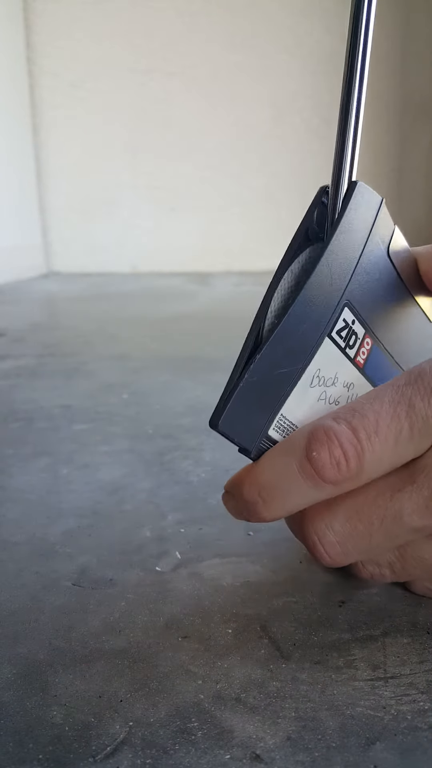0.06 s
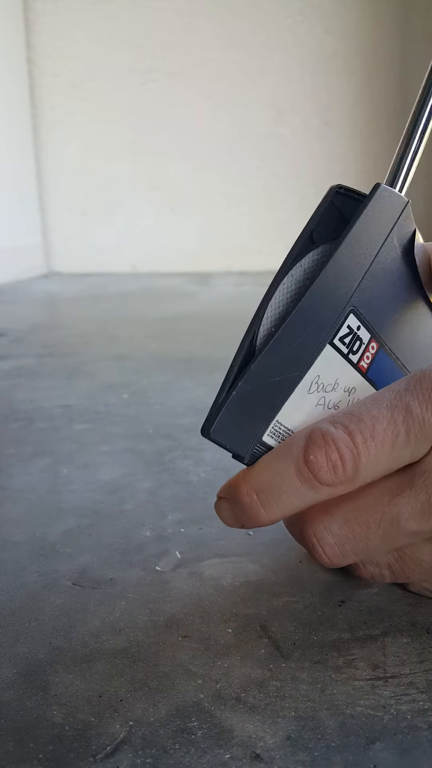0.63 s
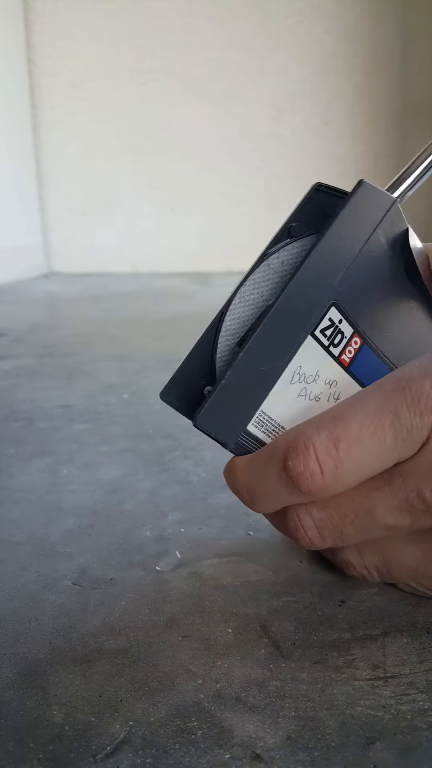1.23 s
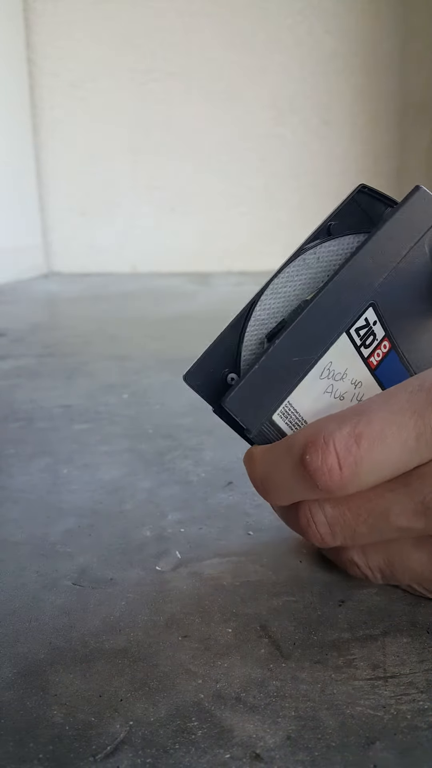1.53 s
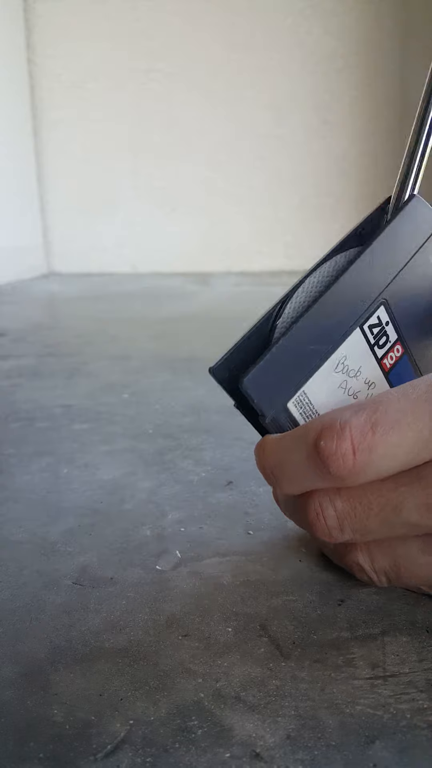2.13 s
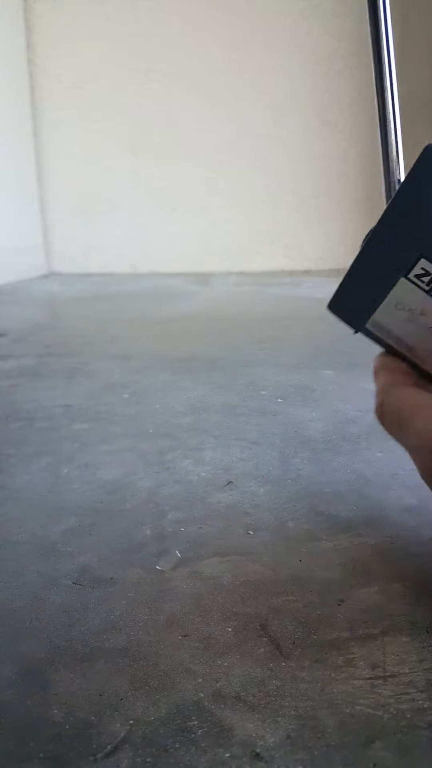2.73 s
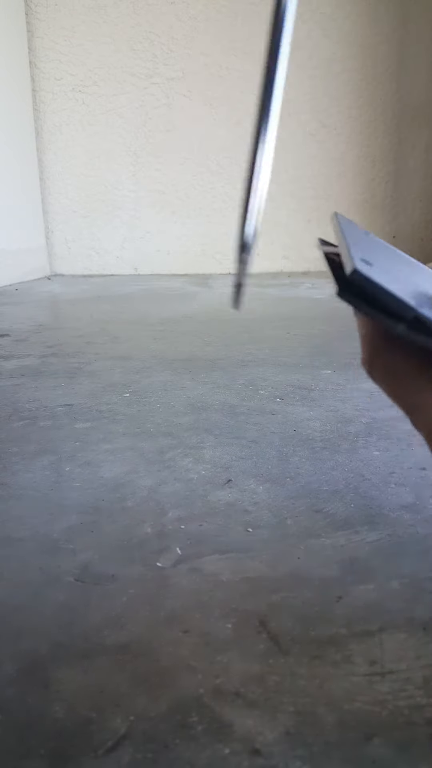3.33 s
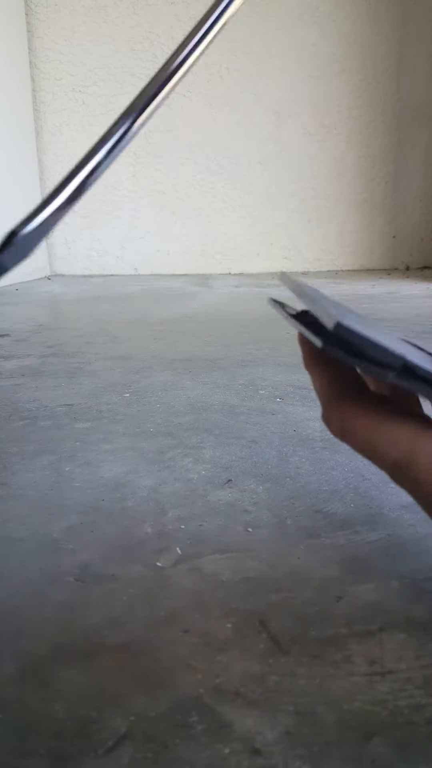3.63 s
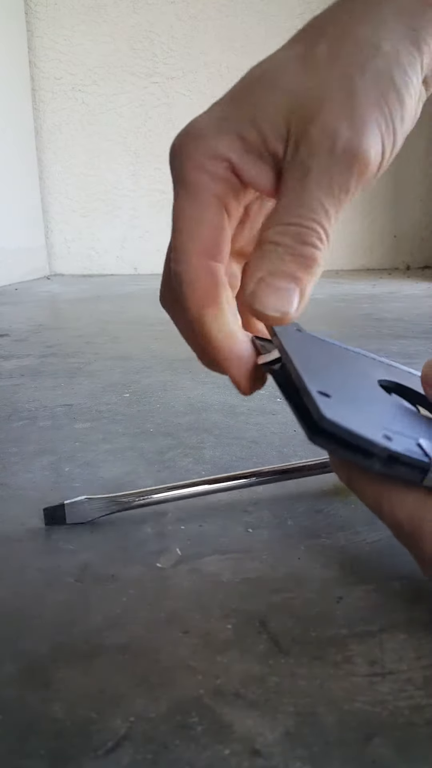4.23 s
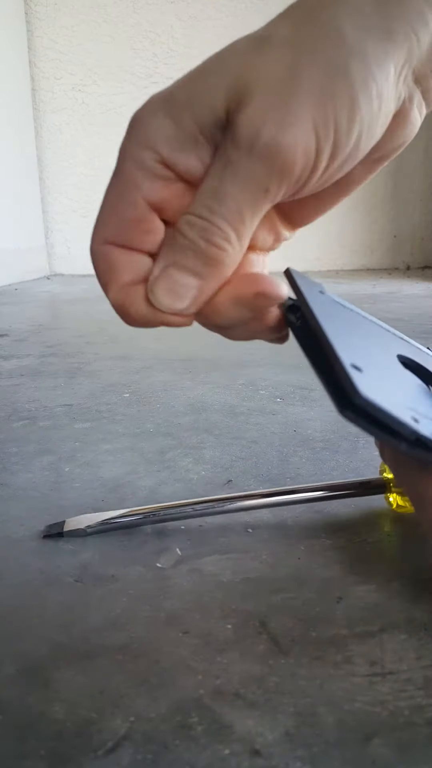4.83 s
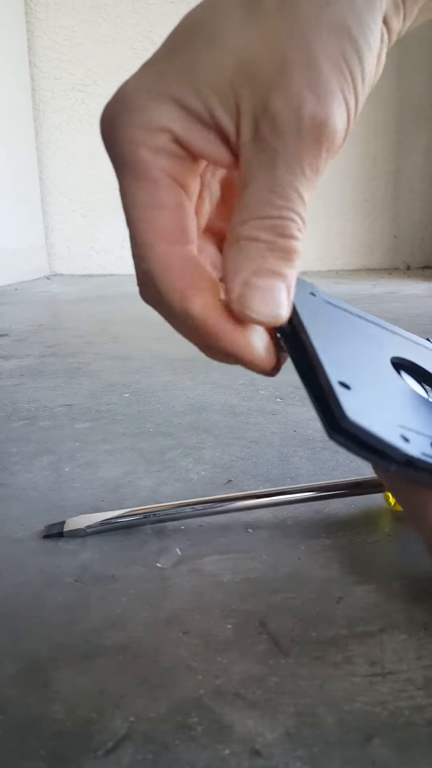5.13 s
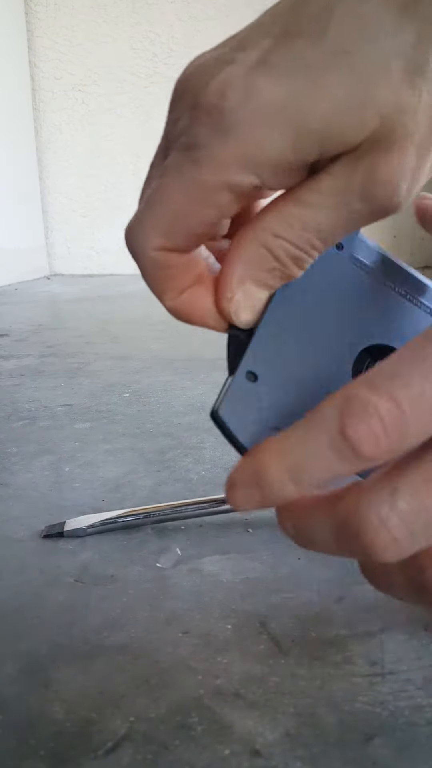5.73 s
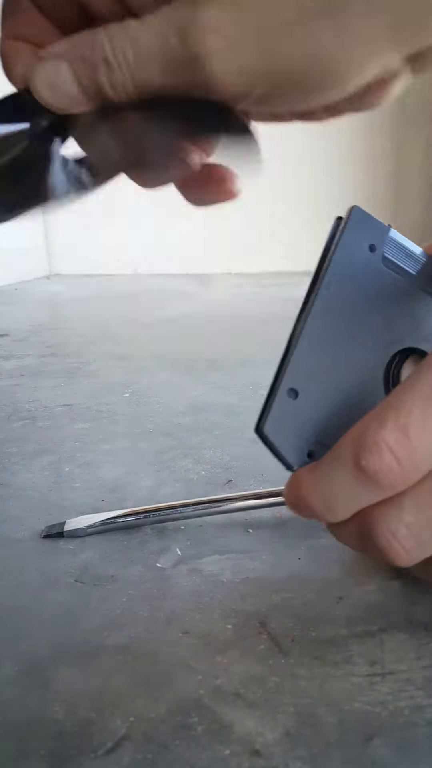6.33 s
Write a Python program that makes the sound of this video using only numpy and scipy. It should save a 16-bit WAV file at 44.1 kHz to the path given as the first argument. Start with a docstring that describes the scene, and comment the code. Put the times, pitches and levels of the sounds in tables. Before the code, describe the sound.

A low, steady hum fills a small bare room. Close by, a screwdriver scrapes and clicks in the seam of a hollow plastic disk cartridge. The plastic cracks at 0.5 and 0.7 seconds, then gives its loudest crack near 0.8, with a short rattle and a brief high ring from the shell and steel shaft. Lighter slips, scrapes and knocks follow, clustering around 2.2 seconds and again near 2.7. At about 3.2 the shell scrapes, knocks and chatters. Near 3.9 the screwdriver is laid on the hard floor and rocks to rest in a few quick taps. From 4 seconds, fingers and a thin flexible disk slide softly against the shell, with scattered ticks and a sharper one at 4.5. The film crackles more strongly from 5.5 to 6.1 as it comes out. The shell snaps and rattles at 6.3. Each click has a short room echo.

```python
"""Over the low hum of a small bare room, a screwdriver scrapes and slips in the seam of a plastic disk
cartridge, just above a hard floor. The hollow shell knocks, its welds crack and its halves chatter;
the loudest crack sets shell and steel shaft ringing. Near 4 s the tool is laid down and rocks to rest.
Then the thin disk slides and crackles out, and the shell snaps once more. The room answers each click."""
import sys
import numpy as np
from scipy import signal
from scipy.fft import rfft, irfft
from scipy.io import wavfile
from scipy.ndimage import uniform_filter1d

SR = 44100
rng = np.random.default_rng(int(sys.argv[2]) if len(sys.argv) > 2 else 0)


def master_out(mix):
    """Clip the mix to full scale and print it as 16-bit PCM to the path in sys.argv[1]."""
    frames = np.transpose(np.atleast_2d(mix))
    ceiling = np.clip(frames, -1, 1)
    pcm = np.round(ceiling * 32767).astype(np.int16)
    wavfile.write(sys.argv[1], SR, pcm)


N = 289737
T = np.arange(N) / SR

# body, middle, treble and air bands of every colour_db: lower f/Hz, upper f/Hz
COLOUR_BANDS = [(90, 1400), (1400, 4000), (4000, 9000), (9000, 16000)]
BAND_FILTERS = [signal.butter(3, band, "bandpass", fs=SR, output="sos") for band in COLOUR_BANDS]
# spectrum of the room noise: f/Hz, relative density/dB
ROOM_SPECTRUM = [(15, -54), (25, -23.5), (114, -5.5), (157, -9), (217, -7.5), (326, -15.5), (373, -14),
                 (754, -23.5), (911, -32), (1040, -29.5), (2350, -36.5), (16000, -53.5)]
# hum tones: low f/Hz, high f/Hz
HUM_TONES = (118.8, 220.3)
# course of the hum: t/s, low tone level/dB, high tone level/dB
HUM_LEVELS = [(.5, -55, -55.5), (4.001, -56, -57.5), (4.3, -53.5, -49), (5.701, -57, -49.5),
              (6.1, -47.5, -66), (6.4, -60, -61)]
# damped resonances of shell, tool handle and disk film: f/Hz, bandwidth/Hz, gain/dB
SHELL_RESONANCES = [(860, 540, 3), (1940, 200, -1), (2702, 730, 8.5), (5740, 2600, 5.5), (13200, 1800, 5)]
HANDLE_RESONANCES = [(1110, 50, 17.3), (2260, 160, 24.4), (2510, 300, 19), (3020, 110, 15)]
FILM_RESONANCES = [(944, 170, 5.2), (1677, 92, 12.6), (2060, 200, 11), (2500, 530, 16.8), (13030, 1600, 10)]
# blade scraping the shell: start t/s, end t/s, level/dB, brightness/dB
BLADE_SCRAPES = [(.09, .38, -58, 5.5), (.664, .683, -44, -1), (.745, .775, -58, -8),
                 (1.008, 1.08, -45, 2.5), (1.846, 2.05, -56, -3.5), (2.135, 2.215, -38, -0.5),
                 (2.62, 2.68, -57.5, 5.5), (2.671, 2.715, -44, -3.5), (2.77, 3.1, -66, 2.5),
                 (2.945, 2.98, -54.5, 5.5), (3.218, 3.248, -34.5, 7)]
# blade slipping in the seam: t/s, level/dB, brightness/dB
BLADE_SLIPS = [(.1718, -34.5, 5), (.2735, -32.5, -3.5), (.3547, -37, 2), (.3646, -28, 2),
               (.4976, -21.5, 1.5), (.7171, -28.5, 3), (.7217, -18, -5.5), (1.0167, -35.5, 4),
               (1.093, -44, -3), (1.3731, -42, -5.5), (1.8511, -35.5, -13.5), (1.941, -42, 2.5),
               (1.9766, -42.5, -7), (2.0145, -35, 0.5), (2.1885, -27, -0.5), (2.2214, -33, -2),
               (2.2416, -30, -7), (2.3943, -41.5, -9), (2.695, -42.5, 7)]
# short hollow knocks and low thumps of the shell and the tool handle: t/s, f/Hz, level/dB
HOLLOW_KNOCKS = [(.365, 1150, -31), (.502, 1560, -17), (.683, 130, -36.5), (.775, 140, -26),
                 (2.15, 650, -31), (2.718, 564, -32.5), (3.2515, 857, -21), (3.267, 2280, -24),
                 (4.062, 390, -35.5)]
# shell cracking or snapping shut: t/s, level/dB, brightness/dB, weight/dB
SHELL_CRACKS = [(.5019, -17.5, -2.5, -2.5), (.6828, -23.5, 6.5, 11), (.7747, -4, -2.5, -1),
                (3.2268, -37.5, 14.5, 13), (3.2372, -36, 14, 9), (6.2934, -16.5, 3.5, 2),
                (6.3198, -30.5, 12.5, -11)]
# loose halves chattering: start t/s, end t/s, level/dB, brightness/dB, weight/dB
SHELL_RATTLES = [(.69, .726, -45, 1.5, -7), (.778, .838, -23.5, 0.5, -4.5), (3.243, 3.272, -29.5, -4, 4.5),
                 (6.302, 6.36, -30, -2, 6.5)]
# blows that ring the steel shaft and the sprung shell: t/s, level/dB
SHAFT_BLOWS = [(.775, -29.5), (1.373, -46.5), (1.851, -47), (2.189, -42), (2.242, -46)]
SHELL_BLOWS = [(.775, -22.5)]
# their normal modes: f/Hz, level/dB, T60/s
SHAFT_MODES = [(2930, 5, 0.067), (5000, -19, .19), (6309, -8.5, 0.27), (11900, -22, 0.089)]
SHELL_MODES = [(2580, -2.5, 0.33), (2750, 0, .33), (2820, -6.5, 0.4), (2980, -7.5, .27), (4195, -3, 0.19),
               (4230, -1.5, .2), (4540, -6, .16), (5470, -2.5, .11)]
# swings of the room sound after two loud cracks: t/s, recovery/s, bass/dB, hiss and reflections/dB
ROOM_SWINGS = [(.78, 0.94, -19.5, -7.5), (6.3, 0.1, -17, 4.5)]
# fingers and film sliding over the shell: start t/s, end t/s, level/dB, brightness/dB
FILM_SLIDES = [(3.68, 3.9, -68, 9), (4.0, 4.31, -53, -1), (4.345, 4.46, -60.5, -2),
               (4.707, 4.919, -55, 3.5), (4.92, 5.05, -68.5, 6.5), (5.29, 5.49, -58, -1.5),
               (5.56, 5.735, -45.5, 0.5), (5.82, 5.94, -46.5, -3), (6.194, 6.3, -55, 8),
               (6.51, 6.57, -62.5, 8)]
# screwdriver rocking on the floor: t/s, level/dB, brightness/dB
TOOL_IMPACTS = [(3.9287, -18.5, -3), (3.9928, -29, -4.5), (4.0467, -38, -2.5), (4.0953, -37.5, 6),
                (4.1148, -40, -3), (4.1916, -32.5, 5.5), (4.2322, -37.5, 2)]
# film buckling and flicking the shell: t/s, level/dB, brightness/dB
FILM_BUCKLES = [(4.5045, -25, 6.5), (4.583, -36, 0), (4.7718, -40.5, 8), (4.8458, -43.5, 11),
                (5.4895, -32.5, -2), (5.6149, -40, -21), (5.7411, -28.5, 6.5), (5.7988, -23.5, -0.5),
                (6.0098, -26, -13.5), (6.0488, -31, -3), (6.056, -21, 0), (6.0797, -18, 0.5),
                (6.09, -21, 0), (6.2499, -35, -2), (6.427, -36, -6)]


def undb(db):
    """Amplitude ratio of a level in decibels."""
    return 10 ** (np.asarray(db) / 20)


def unit(x):
    """Normalisation to rms 1."""
    return x / np.sqrt(np.mean(x ** 2))


def add(out, start_s, x):
    """Superposition: x joins out at a given time."""
    i = int(start_s * SR)
    out[:, i:i + x.shape[1]] += x[:, :N - i]


def pan(db):
    """Level difference, left over right, at unit mean power."""
    return unit(undb([[db / 2], [-db / 2]]))


def lagged(x, lag_s):
    """Path difference: sound reaches the right microphone earlier or later than the left."""
    return np.array([x[0], np.roll(x[1], int(round(lag_s * SR)))])


def noise_pair(size, correlation):
    """Partial coherence: two microphones share part of a noise."""
    common = np.sqrt(correlation) * rng.standard_normal(size)
    return common + np.sqrt(1 - correlation) * rng.standard_normal((2, size))


def drift(rate_hz):
    """Random modulation of rms 1, linear between draws."""
    step = int(SR / rate_hz)
    stairs = np.repeat(rng.standard_normal(N // step + 1), step)
    return unit(uniform_filter1d(stairs, step)[:N])


def colour(shared_db, brightness_db, weight_db=0):
    """Spectral balance: weight shifts the lowest band, brightness the upper two."""
    return np.add(shared_db, (weight_db, 0, brightness_db, brightness_db))


def radiate(force, body, colour_db):
    """Forced vibration: a force drives damped resonances, and each band is scaled to a set energy."""
    response = force + sum(undb(db) * signal.lfilter(*signal.iirpeak(hz, hz / width, SR), force)
                           for hz, width, db in body)
    out = 0
    for sos, db in zip(BAND_FILTERS, colour_db):
        band = signal.sosfilt(sos, response)
        out = out + undb(db) * band / np.sqrt(np.sum(band ** 2, axis=1, keepdims=True))
    return out


def rubs(table, body, colour_db, attack_share, release_share, slips_per_s, scatter_db, slip_s,
         hiss_db, catch_db, pan_db):
    """Stick-slip friction: tiny random releases over a fine hiss drive a body during each stroke."""
    out = np.zeros((2, N))
    releases = rng.random(N) < slips_per_s / SR
    slips = releases * undb(scatter_db * np.clip(rng.standard_normal(N), -2, 2))
    relaxation = signal.lfilter([1], [1, -np.exp(-1 / (slip_s * SR))], slips)
    grip = (unit(relaxation) + undb(hiss_db)) * undb(catch_db * drift(110))
    friction = lagged(grip * noise_pair(N, correlation=.17), .00014)
    for start, end, db, *tone in table:
        stroke = friction[:, int(start * SR):int(max(end, start + .01) * SR)]
        size = stroke.shape[1]
        along = np.linspace(0, 1, size)
        pressure = np.minimum(np.minimum(along / attack_share, (1 - along) / release_share), 1)
        force = np.pad(stroke * pressure, ((0, 0), (0, 512)))  # time to ring out
        add(out, start, np.sqrt(size) * undb(db) * radiate(force, body, colour(colour_db, *tone)))
    return out * pan(pan_db)


def clicks(table, body, colour_db, rise_s, snap_s, ring_s, ring_db, pan_db):
    """Impulsive excitation: a sharp snap, then the dense, quickly damped ringing of the part."""
    out, t = np.zeros((2, N)), T[:2048]
    span, lead = .005 * SR, 16  # samples: level averaging time, margin for the lag
    envelope = (1 - np.exp(-t / rise_s)) * (np.exp(-t / snap_s) + undb(ring_db) * np.exp(-t / ring_s))
    for start, db, *tone in table:
        force = noise_pair(len(t), correlation=.82) * envelope
        sound = radiate(force, body, colour(colour_db, *tone))
        # every contact radiates from a different spot
        sound = lagged(np.pad(sound, ((0, 0), (lead, 0))), rng.uniform(-.00022, .00022))
        add(out, start - lead / SR, np.sqrt(span) * undb(db) * sound)
    return out * pan(pan_db)


def ring(blows, modes, pan_db):
    """Free vibration: modes decay exponentially and reach each microphone in a different phase."""
    out, t = np.zeros((2, N)), T[:SR // 2]
    for start, db in blows:
        for hz, mode_db, t60 in modes:
            phase = rng.uniform(0, 2 * np.pi) + .34 * rng.standard_normal((2, 1))
            envelope = undb(db + mode_db) * np.exp(-np.log(1000) * t / t60)
            add(out, start, envelope * np.sin(2 * np.pi * hz * t + phase))
    return out * pan(pan_db)


def background(bass_swing_db, hiss_swing_db):
    """Ambient noise: a continuous spectrum of rumble and hiss with two wavering hum tones."""
    hz = np.maximum(np.fft.rfftfreq(N, 1 / SR), 1)
    points_hz, density_db = np.transpose(ROOM_SPECTRUM)
    shape = unit(undb(np.interp(np.log(hz), np.log(points_hz), density_db)))
    bass_share = 1 / (1 + (hz / 600) ** 4)
    rumble = irfft(rfft(noise_pair(N, correlation=.93)) * shape * np.sqrt(bass_share), N)
    rumble *= undb(-48 + .5 * drift(4.7))
    hiss = irfft(rfft(noise_pair(N, correlation=.35)) * shape * np.sqrt(1 - bass_share), N)
    hiss *= undb(-45 + hiss_swing_db)
    times, *levels = np.transpose(HUM_LEVELS)
    hum = 0
    for tone_hz, db in zip(HUM_TONES, levels):
        phase = 2 * np.pi * np.cumsum(tone_hz + 1.5 * drift(7.2)) / SR
        hum = hum + unit(np.sin(phase)) * undb(np.interp(T, times, db) + 2 * drift(6.2))
    return (rumble + hum) * undb(bass_swing_db) * pan(9) + hiss * pan(5.5)


def blade_scrapes():
    """Sliding friction: steel on plastic drives the shell with dense, even slips."""
    return rubs(BLADE_SCRAPES, SHELL_RESONANCES, colour_db=(-8, 1, -5, -9.5),
                attack_share=.16, release_share=.18, slips_per_s=600, scatter_db=1.5, slip_s=.00083,
                hiss_db=-5, catch_db=0, pan_db=4.5)


def room(x, wall_s, wall_db, tail_db, t60_s, colour_db):
    """Reflection and reverberation: one echo from the near wall and a decaying diffuse field."""
    t = T[:int(.7 * SR)]
    onset = np.clip((t - .007) / .003, 0, 1)
    response = 0
    for sos, t60, db in zip(BAND_FILTERS, t60_s, colour_db):
        fade = onset * np.exp(-np.log(1000) * t / t60)
        diffuse = signal.sosfilt(sos, noise_pair(len(t), correlation=.16))
        response = response + undb(tail_db + db) * diffuse * fade / np.sqrt(np.sum(fade ** 2))
    crossfed = (x + x[::-1] * .5) / np.sqrt(2)
    out = signal.fftconvolve(crossfed, response, axes=1)[:, :N]
    add(out, wall_s, undb(wall_db) * x)
    return out


def blade_slips():
    """Static friction gives way: the blade jumps in the seam and strikes the shell."""
    return clicks(BLADE_SLIPS, SHELL_RESONANCES, colour_db=(-16.5, 0, -4, -13.5),
                  rise_s=.000092, snap_s=.00032, ring_s=.0049, ring_db=-2.5, pan_db=4)


def hollow_knocks(t60_s):
    """Damped oscillation: each knock or thump of shell or tool handle is one short-lived mode."""
    return sum(ring([(start, db)], [(hz, 0, t60_s)], pan_db=4.5) for start, hz, db in HOLLOW_KNOCKS)


def shell_cracks():
    """Release of elastic energy: a weld breaks or the shell snaps shut."""
    return clicks(SHELL_CRACKS, SHELL_RESONANCES, colour_db=(-10.5, 3, -2, -7.5),
                  rise_s=.0007, snap_s=.0011, ring_s=.0019, ring_db=-3.5, pan_db=5.5)


def shell_rattles():
    """Intermittent contact: the loose halves chatter after a crack."""
    return rubs(SHELL_RATTLES, SHELL_RESONANCES, colour_db=(-12.5, 1, -2.5, -14.5),
                attack_share=.12, release_share=.4, slips_per_s=750, scatter_db=6.5, slip_s=.0009,
                hiss_db=.5, catch_db=4, pan_db=2)


def shaft_and_shell_rings():
    """Lightly damped normal modes: the steel shaft and the sprung shell sound on after a blow."""
    return ring(SHAFT_BLOWS, SHAFT_MODES, pan_db=-5) + ring(SHELL_BLOWS, SHELL_MODES, pan_db=6)


def room_swings(bass_onset_s, hiss_onset_s):
    """Amplitude modulation in dB: the bass dips twice; hiss and reflections dip first, later swell."""
    bass = hiss = 0
    for start, recovery_s, bass_db, hiss_db in ROOM_SWINGS:
        bass = bass + np.interp(T, start + np.cumsum([0, bass_onset_s, recovery_s]), [0, bass_db, 0])
        hiss = hiss + np.interp(T, start + np.cumsum([0, hiss_onset_s, recovery_s]), [0, hiss_db, 0])
    return bass, hiss


def film_slides():
    """Sliding friction: fingers and film catch on the shell in sparse, uneven slips."""
    return rubs(FILM_SLIDES, FILM_RESONANCES, colour_db=(-5.5, 2, -7.5, -11),
                attack_share=.32, release_share=.18, slips_per_s=250, scatter_db=9.5, slip_s=.0021,
                hiss_db=-4, catch_db=5, pan_db=6)


def tool_rocking():
    """Repeated impact: the hard floor excites the handle's resonances as the tool settles."""
    return clicks(TOOL_IMPACTS, HANDLE_RESONANCES, colour_db=(-15, -.5, -6.5, -15.5),
                  rise_s=.00035, snap_s=.00058, ring_s=.0028, ring_db=-7, pan_db=6.5)


def film_crackles():
    """Buckling: the thin disk jumps between shapes and flicks the shell."""
    return clicks(FILM_BUCKLES, FILM_RESONANCES, colour_db=(-11.5, -1, -7.5, -16.5),
                  rise_s=.0002, snap_s=.0005, ring_s=.0057, ring_db=-2, pan_db=5.5)


def scene():
    """Superposition of direct sound, reflections and ambient noise."""
    cracks, blade, tool, film = shell_cracks(), blade_slips(), tool_rocking(), film_crackles()
    friction = blade_scrapes() + film_slides() + shell_rattles()
    knocks = hollow_knocks(t60_s=.035)
    direct = cracks + blade + tool + film + friction + knocks + shaft_and_shell_rings()
    # cracks and rubbing sound more reverberant than the small clicks
    into_room = cracks + undb(-4) * (blade + knocks) + undb(-2.5) * tool + undb(-6.5) * film + friction
    reflections = room(into_room, wall_s=.011, wall_db=-15, tail_db=-8,
                       t60_s=(.23, .35, .32, .28), colour_db=(-1, -1.6, -1, -.65))
    bass_swing_db, hiss_swing_db = room_swings(bass_onset_s=.14, hiss_onset_s=.61)
    return direct + reflections * undb(hiss_swing_db) + background(bass_swing_db, hiss_swing_db)


def record(dry):
    """Saturation and band limiting: the loudest crack overloads the microphone; the top is cut."""
    lowpass = signal.ellip(12, .2, 90, 16100, fs=SR, output="sos")
    return signal.sosfilt(lowpass, np.tanh(dry))


dry = scene()
out = record(dry)
master_out(out)
```